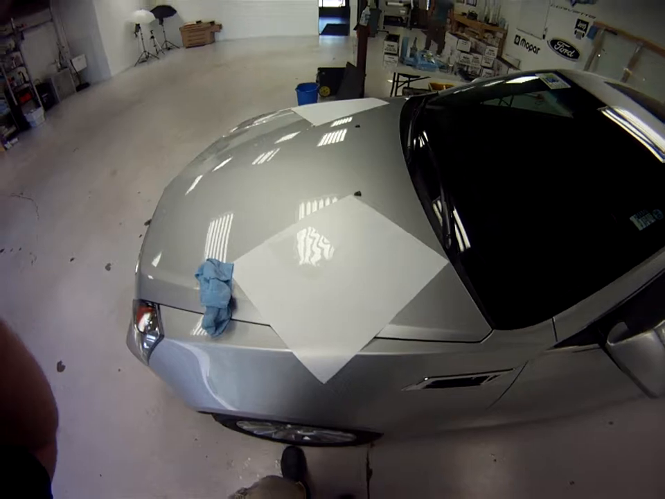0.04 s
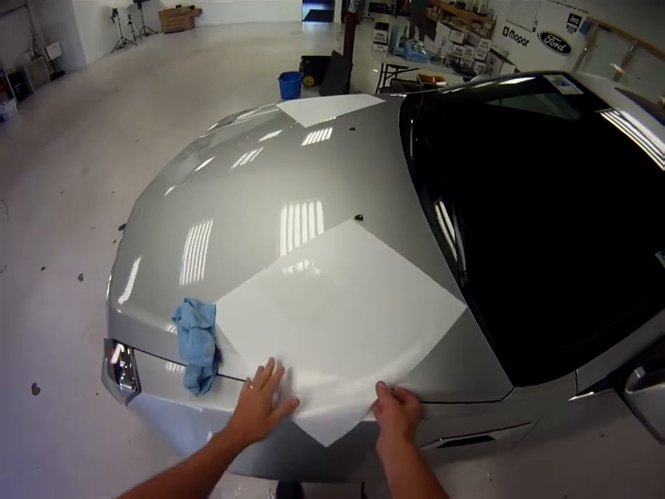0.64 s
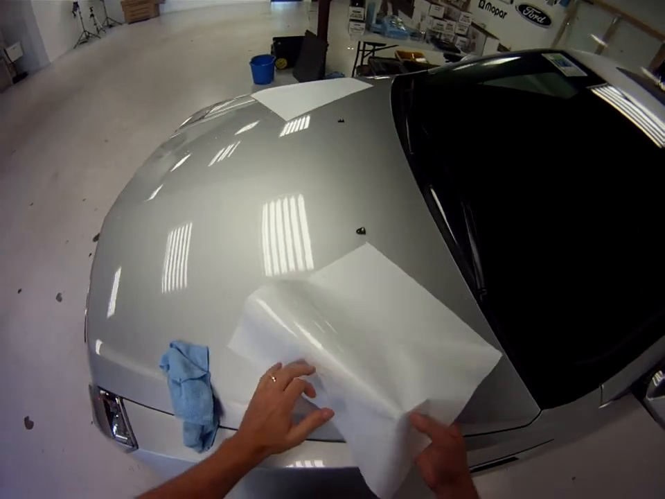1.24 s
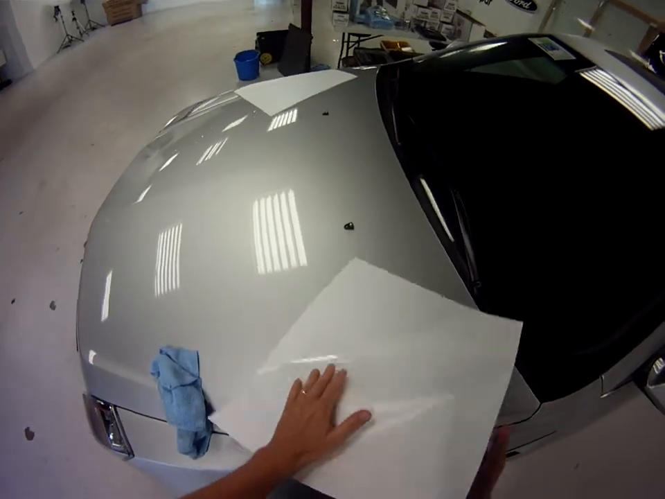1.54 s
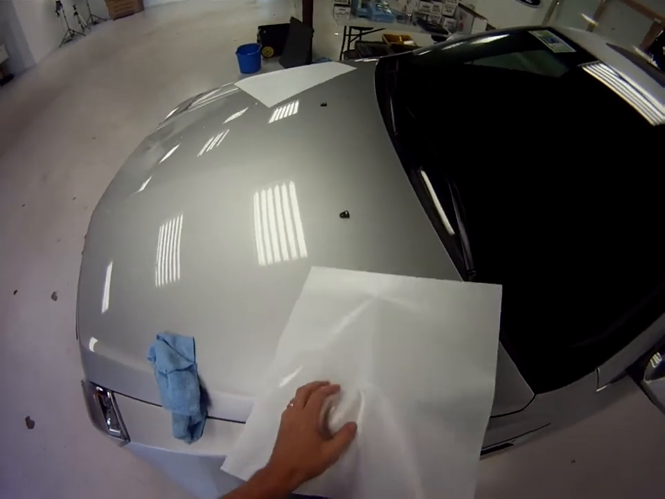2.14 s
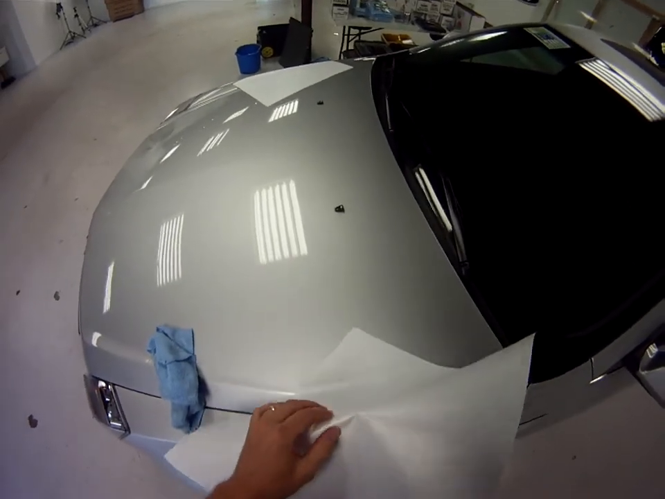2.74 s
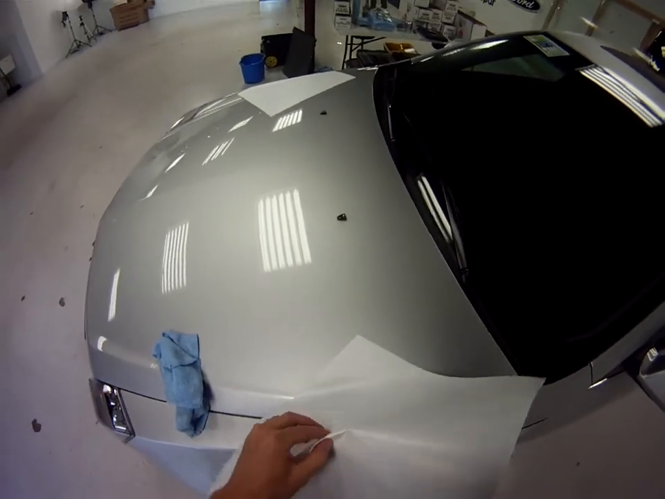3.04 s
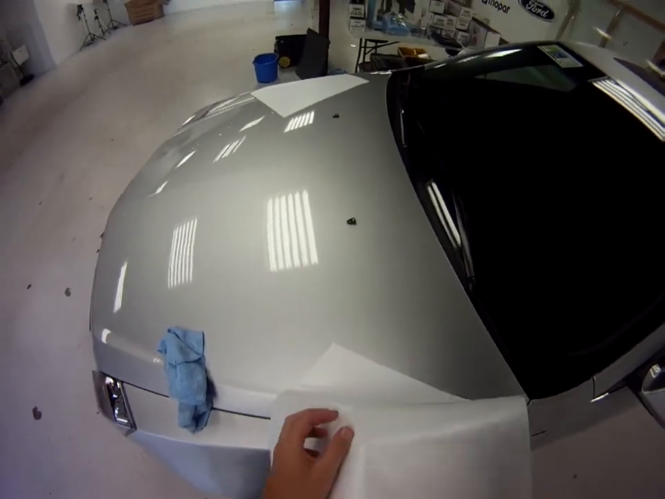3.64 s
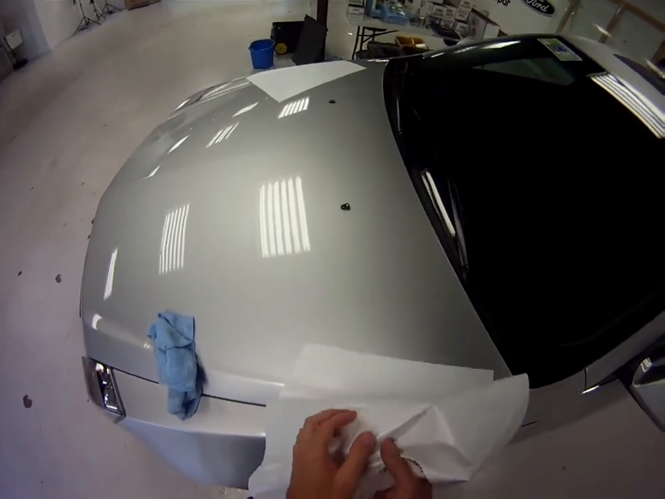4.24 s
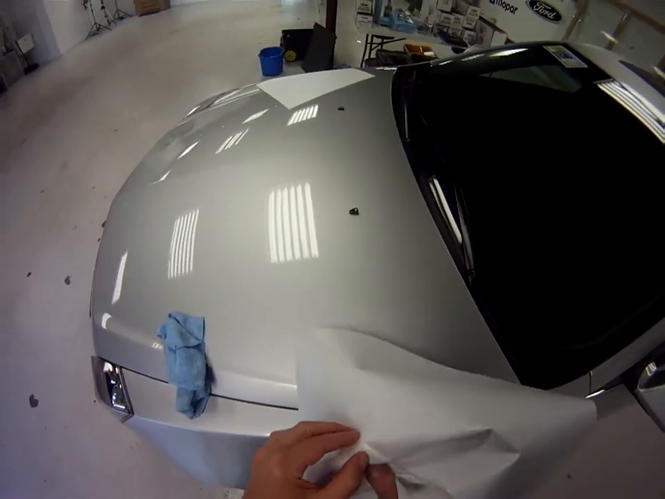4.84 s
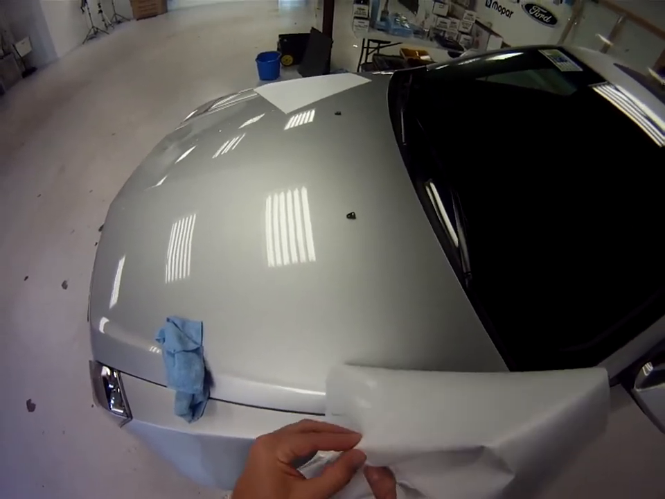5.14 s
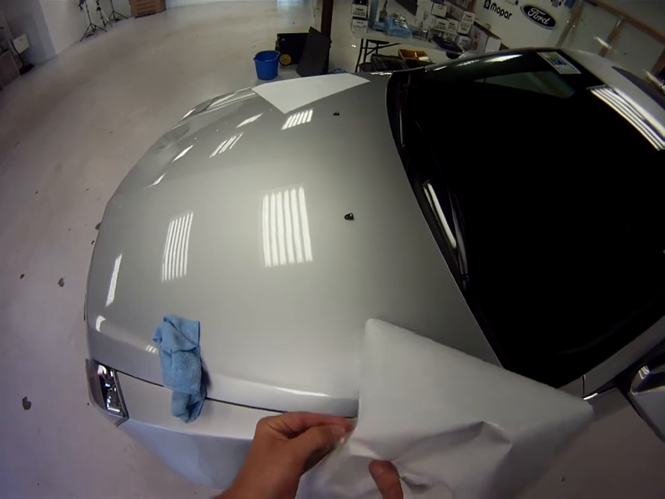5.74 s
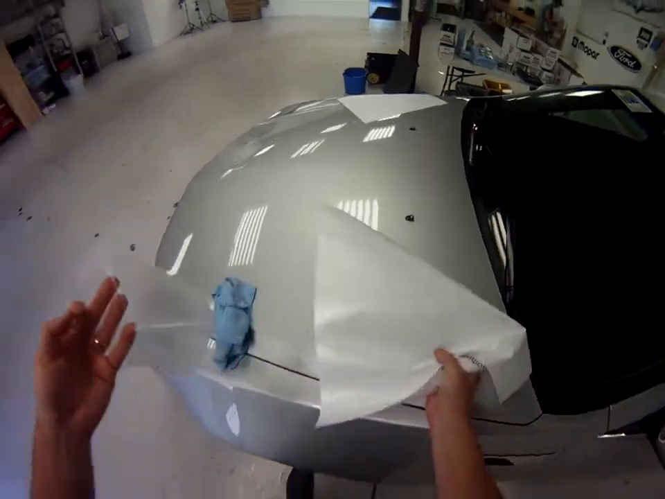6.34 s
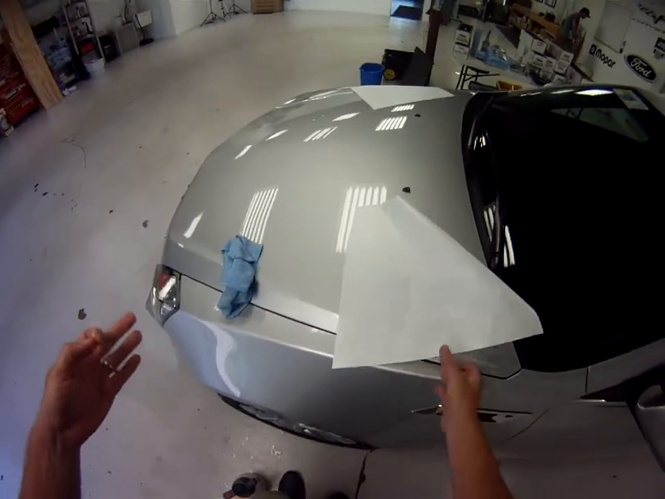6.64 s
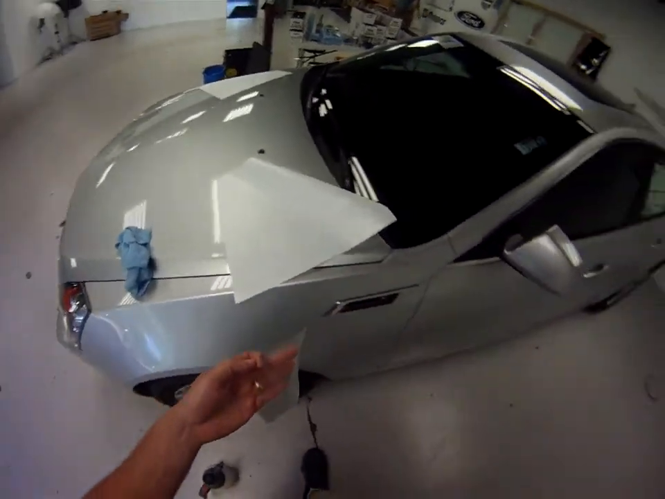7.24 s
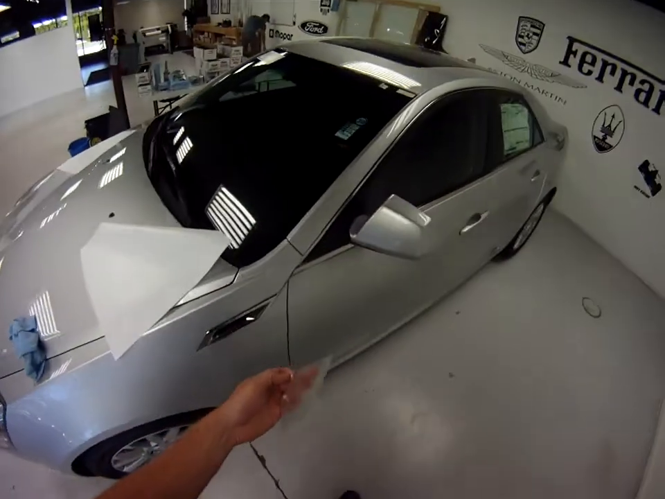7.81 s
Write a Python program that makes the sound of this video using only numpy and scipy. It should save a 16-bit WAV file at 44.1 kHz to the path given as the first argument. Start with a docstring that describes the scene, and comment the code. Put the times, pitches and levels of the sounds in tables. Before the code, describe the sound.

A short, sharp microphone pop opens the sound, and a quiet ventilation rumble and hiss continues throughout. From about 0.7 seconds a large sheet of paper-backed plastic film rustles close by as it is lifted and bent, with sharp snaps around 1.1 seconds and dense, crisp crinkling from 1.5 to 1.9 seconds. It dies down until 3 seconds, when a crease snaps, followed by a short crinkle around 3.5 seconds. Scattered single snaps come near 4.2, 4.6, 4.9 and 5.7 seconds, with a very faint hiss of fingers rubbing paper. A second loud burst of crinkling and snapping runs from 6.2 to 6.7 seconds. Soft, deep footsteps follow from 6.5 seconds to the end, with light rustles near 7.4 and 7.8 seconds. Each snap rings briefly in the workshop hall. The sound is mono and slightly tinny, from a head-worn microphone.

```python
"""Plastic film buckling in a workshop

A large sheet of plastic film on paper backing is lifted, bent and picked at on a car bonnet. Its creases
buckle in single snaps and dense crinkling, and fingers rub the paper. The hall reverberates, its
ventilation hums and soft steps follow. A head-worn mono camera pops as it starts; its housing resonates
near 2 kHz and it holds each sample of a 12 kHz stream."""
import sys
import numpy as np
from scipy import signal
from scipy.fft import rfft, irfft
from scipy.io import wavfile
from scipy.ndimage import uniform_filter1d

SR = 44100
rng = np.random.default_rng(int(sys.argv[2]) if len(sys.argv) > 2 else 0)


def unload_audio(sound):
    """Save the sound as a 16-bit wav file, at the path given as the first command line argument."""
    columns = np.transpose(np.atleast_2d(sound))
    # keep every value between -1 and 1, then stretch to whole-number steps
    steps = np.round(np.clip(columns, -1, 1) * 32767)
    wavfile.write(sys.argv[1], SR, steps.astype(np.int16))


N = 347375
TIME = np.arange(N) / SR
AIR_DB = -58  # level of the ventilation
# Spectrum of the sheet before the housing. Each row: frequency in Hz, relative spectral density in dB.
SHEET = [(150, -20), (400, -7.5), (850, -4.5), (1250, 5), (1700, 7), (2200, 4.5), (2700, 5.5), (3050, 1.5),
         (3500, 6), (4000, 0), (4600, -10), (5300, -6.5), (6000, -7)]


def snaps(creases, body_db=-6.0, flap_db=1.5, ring_db=1.5, flutter_db=-23, flutter_s=0.059, size=2048):
    """Dispersion: bending waves spread a buckling crease's click over a few ms, the low ones longest."""
    out, t = np.zeros(N), np.arange(size) / SR
    colour = through_housing(SHEET)
    noises = rng.standard_normal((len(creases), size))
    for (s, db, low_db, crack_db, hz, swell_ms), noise in zip(creases, noises):
        age = t * 1e3 / swell_ms
        quick, slow = [noise * a * np.exp((1 - a ** 2) / 2) for a in (age, age / 1.83)]
        flutter = noise * from_db(flutter_db) * np.exp(-t / flutter_s)
        body = band(convolve(quick + flutter, colour), 1350, 4600)
        body = body + from_db(ring_db) * facet(body, hz, width_hz=300)
        flap = facet(slow, 1260, width_hz=340) + from_db(-12.5) * band(slow, 426, 1170)
        crack = band(quick, 4950, 5600)
        for part, level_db in [(flap, low_db + flap_db), (body, db + body_db), (crack, crack_db)]:
            peak_rms = np.sqrt(uniform_filter1d(part ** 2, size=176).max())  # loudest 4 ms
            add(out, s - 0.0008, from_db(level_db) * part / peak_rms)
    return out


def facet(x, hz, width_hz):
    """Resonance: a flipped facet rings as one damped mode, with unit gain at its peak."""
    r = np.exp(-np.pi * width_hz / SR)
    feedback = [1, -2 * r * np.cos(2 * np.pi * hz / SR), r * r]
    return signal.lfilter((1 - r * r) / 2 * np.array([1, 0, -1]), feedback, x)


def lesser_creases(effort, per_s=22, spread_db=3, facet_hz=2120, spread_hz=37, swell_ms=1.8):
    """Stress release: creases yield at uneven times, as hard as the sheet is bent; rows for snaps()."""
    rows, s = [], 0
    for wait, strength, pitch in rng.standard_normal((400, 3)):
        s += np.exp(wait / 2) / per_s
        if s >= TIME[-1]:
            break
        db = 20 * np.log10(effort[int(s * SR)]) - 1.5 + spread_db * np.tanh(strength)
        if db > AIR_DB:
            rows.append((s, db, db - 24.5, db - 36, facet_hz + spread_hz * pitch, swell_ms))
    return rows


def crinkle(effort, level_db=-3.0, per_s=1700, spread_db=1.0, clumps_per_s=110, slide_gain=0.93):
    """Shot noise: tiny creases yield more often as the sheet bends harder, over sliding paper's hiss."""
    rate = per_s * (0.13 + np.sqrt(effort / effort.max()))
    buckles = rng.random(N) < rate / SR
    sizes = from_db(spread_db * np.minimum(rng.exponential(1, N), 4)) * rng.choice([-1, 1], N)
    grains = rms_one(buckles * sizes / np.sqrt(rate)) + slide_gain * rng.standard_normal(N)
    clumps = from_db(3 * np.tanh(drift(clumps_per_s)))
    colour = energy_one(through_housing(SHEET))
    return from_db(level_db) * convolve(effort * rms_one(grains * clumps), colour)


def rubbing(grip_db=1.5, grips_per_s=60):
    """Stick-slip friction: skin on paper gives a thin hiss, uneven as it grips and slips."""
    # Finger strokes. Each row: peak time in seconds, level in dB, rise and fall times in seconds.
    strokes = [(1.09, -66, .08, 0.44), (2.25, -72.5, .02, .25), (4.14, -69, 0.1, .06),
               (5.9, -70.5, .3, 0.33), (7.39, -63, .004, .02), (7.81, -65, .01, .06)]
    grip = from_db(grip_db * np.tanh(drift(grips_per_s)))
    return swells(strokes) * grip * rms_one(band(rng.standard_normal(N), 3100, 5700))


def starting_pop(peak_db=-11.0, thump_db=-10, thump_s=0.00358, fizz_db=-28, fizz_s=0.017):
    """Transient response: the camera starts with a fizz, three clicks and a thump; two modes ring on."""
    # The clicks. Each row: start in seconds, peak in dB relative to peak_db.
    clicks = [(0.0192, 6.5), (0.0221, 7.5), (0.026, -6.5)]
    # A low wobble and a ping. Each row: frequency in Hz, level in dB, time to fall 60 dB in seconds.
    modes = [(33.8, -27.5, 0.33), (895, -26.5, 0.12)]
    # A click's spectrum before the housing. Each row: frequency in Hz, relative spectral density in dB.
    click_spectrum = [(100, -44), (350, -20.5), (600, 8), (1000, 7), (1600, 4.5), (2100, -8), (3000, -11),
                      (4500, -15), (6000, -33)]
    out, t = np.zeros(N), np.arange(SR // 2) / SR
    click = through_housing(click_spectrum)
    first_s, last_s = clicks[0][0], clicks[-1][0]
    for s, db in clicks:
        add(out, s, from_db(db + peak_db) * peak_one(click))
    add(out, first_s, -from_db(thump_db) * np.sin(np.pi * np.minimum(t / thump_s, 1)))
    for hz, db, t60 in modes:
        add(out, last_s, from_db(db - 60 * t / t60) * np.sin(2 * np.pi * hz * t))
    fizz = rng.standard_normal(N) * (np.abs(TIME - first_s) < fizz_s / 2)
    return out + from_db(fizz_db) * convolve(fizz, energy_one(click))


def steps(level_db=-8.0, thud_s=0.0056, sway_db=-8.0, sway_s=0.06, lead_s=0.01486, size=22000):
    """Body conduction: footfalls reach the camera as dull thuds, each with a slower, deeper sway."""
    # Soft steps. Each row: time in seconds, thud peak in dB relative to level_db.
    footfalls = [(6.52, -43), (6.929, -44), (7.383, -34.5), (7.74, -48.5), (7.82, -48)]
    out, t = np.zeros(N), np.arange(size) / SR
    for (s, db), noise in zip(footfalls, rng.standard_normal((len(footfalls), size))):
        thud = peak_one(band(noise * t * np.exp(-t / thud_s), 34, 58))
        sway = peak_one(band(noise * t * np.exp(-t / sway_s), 21, 42.5))
        add(out, s - lead_s, from_db(db + level_db) * (thud + from_db(sway_db) * sway))
    return out


def snaps_all_round(creases, level_db=8.5, crack_share_db=12.0):
    """Radiated power: summed over all directions, a snap has the even colour of the whole sheet."""
    out, colour = np.zeros(N), energy_one(through_housing(SHEET))
    for s, body_db, _, crack_db, _, _ in creases:
        strength = np.hypot(from_db(body_db), from_db(crack_db + crack_share_db))
        add(out, s, from_db(level_db) * strength * colour)
    return out


def workshop(x, gap_s=0.00926, early_db=9.5, early_s=0.012):
    """Reverberation: bonnet and floor reflect first, then the hall's tail decays band by band."""
    # Decay of the hall. Each row: frequency in Hz, time to fall 60 dB in seconds.
    decay_times = [(300, 0.71), (1200, 1.0), (2200, 1), (5000, 1)]
    t, edges_hz = np.arange(SR) / SR, np.geomspace(200, 6400, num=6)
    white, tail = rng.standard_normal((2, SR)), np.zeros(SR)
    for k, (low, high) in enumerate(zip(edges_hz, edges_hz[1:])):
        t60 = at_hz(decay_times, np.sqrt(low * high))
        tail += band(white[k % 2], low, high) * from_db(-60 * t / t60)
    response = tail * (t > gap_s) * (1 + from_db(early_db) * np.exp(-t / early_s))
    bandwidth_share = 2 * edges_hz[-1] / SR
    return convolve(x, energy_one(response) * np.sqrt(bandwidth_share))


def ventilation(waver_db=1.0, wavers_per_s=3.536):
    """Broadband noise: the ventilation rumbles and hisses at a slightly wavering level."""
    # Its spectrum before the housing. Each row: frequency in Hz, relative spectral density in dB.
    air_spectrum = [(20, 5.5), (45, 7), (100, 4.5), (200, 1), (400, -4.5), (800, -8.5), (1400, -13),
                    (2100, -21), (3000, -17.5), (4200, -16.5), (5300, -24), (6000, -18)]
    gain = from_db(AIR_DB + waver_db * drift(wavers_per_s))
    return gain * rms_one(convolve(rng.standard_normal(N), through_housing(air_spectrum)))


def through_housing(spectrum, size=4096):
    """Resonant colouring: the minimum-phase impulse response of a spectrum lifted by the housing."""
    # Modes of the camera housing. Each row: frequency in Hz, nominal width in Hz, lift in dB.
    modes = [(2135, 353, 19.5), (3400, 220, 8), (5110, 610, 7.5)]
    hz = np.arange(size // 2 + 1) * SR / size
    power_lift = 1 + sum((from_db(db) ** 2 - 1) / (1 + (2 * (hz - centre) / width) ** 2) ** 1.4
                         for centre, width, db in modes)
    cepstrum = irfft(np.log(from_db(at_hz(spectrum, hz)) * np.sqrt(power_lift)))
    cepstrum[1:size // 2] *= 2  # folding the cepstrum makes the response causal
    cepstrum[size // 2 + 1:] = 0
    return irfft(np.exp(rfft(cepstrum)))


def swells(movements):
    """Incoherent addition: movements build and relax exponentially, and their powers add."""
    power = 0
    for s, db, rise_s, fall_s in movements:
        away = np.maximum((s - TIME) / rise_s, (TIME - s) / fall_s)
        power = power + (from_db(db) * np.exp(-np.minimum(away, 20))) ** 2
    return np.sqrt(power)


def drift(knots_per_s):
    """Random modulation of unit rms, linear between knots."""
    knots = rng.standard_normal(4000)
    return rms_one(np.interp(TIME * knots_per_s, np.arange(len(knots)), knots))


def from_db(db):
    """Decibels to amplitude ratio."""
    return 10 ** (np.asarray(db) / 20)


def rms_one(x):
    """Normalise to unit rms."""
    return x / np.sqrt(np.mean(x ** 2) + 1e-20)


def energy_one(x):
    """Normalise to unit energy."""
    return x / np.sqrt(np.sum(x ** 2))


def peak_one(x):
    """Normalise to unit peak."""
    return x / np.abs(x).max()


def at_hz(points, hz):
    """Interpolate a table on a log-frequency axis."""
    knots_hz, values = np.transpose(points)
    return np.interp(np.log(np.maximum(hz, 1)), np.log(knots_hz), values)


def band(x, low_hz, high_hz):
    """Causal band-pass filter."""
    return signal.sosfilt(signal.butter(2, [low_hz, high_hz], "band", fs=SR, output="sos"), x + 1e-18)


def convolve(x, response):
    """Linear filtering by an impulse response."""
    return signal.fftconvolve(x, response)[:len(x)]


def add(out, s, sound):
    """Superpose a sound from s seconds on."""
    start = max(round(s * SR), 0)
    out[start:start + len(sound)] += sound[:N - start]


def scene(crinkle_room_db=-7):
    """Superposition: the sheet's direct sound, the hall and the background meet at one microphone."""
    # The loudest creases buckling. Each row: time in seconds, relative levels of body, low flap and
    # high crack in dB, facet pitch in Hz, swell time in milliseconds.
    loud_creases = [(0.7, -38.5, -62, -51.5, 2160, 2.1), (0.7233, -35, -65, -44.5, 2030, 2.7),
                    (0.9662, -35, -61.5, -55, 2130, 1.9), (0.9857, -35, -55, -56, 2120, 1.4),
                    (1.0211, -38, -54.5, -55, 2090, 1.9), (1.0974, -20.5, -51, -41, 2100, 2.1),
                    (1.1124, -28.5, -48, -56, 1990, 1.8), (1.1353, -20, -52, -38, 2380, 2.3),
                    (1.1634, -33, -56, -51, 2340, 2.1), (1.258, -35.5, -54.5, -60, 2000, 2),
                    (1.493, -30.5, -65, -68, 1940, 2.1), (1.5804, -20, -48, -47, 2140, 1.6),
                    (1.6144, -23.5, -57, -48, 2100, 2.4), (1.7012, -25.5, -47, -45, 2060, 2.1),
                    (1.718, -22, -57, -54, 2030, 1.3), (1.7325, -21, -61, -55, 2030, 2),
                    (1.7524, -25.5, -56, -50, 2070, 2.1), (1.8327, -32, -51, -66, 2040, 2.2),
                    (3.0372, -25, -48, -43, 2330, 2.6), (3.1764, -35, -55, -55.5, 2180, 1.9),
                    (3.5056, -24.5, -46, -49, 2290, 2.06), (3.5964, -32, -59, -49, 2120, 2.9),
                    (3.8769, -37, -54, -71, 2190, 2.1), (3.9185, -28.5, -57, -69.5, 2210, 2.9),
                    (4.0711, -35.5, -57, -58, 2060, 2.6), (4.188, -29, -60, -50.5, 2060, 1.6),
                    (4.6369, -21, -47, -44, 2000, 2.95), (4.9081, -31.5, -41.5, -45, 1910, 2.1),
                    (5.6188, -39, -71, -77, 2000, 1.1), (5.6416, -37.5, -66, -66, 2060, 1.9),
                    (5.7185, -30, -45.5, -39.5, 2290, 1.66), (5.8369, -32.5, -52.5, -50, 2260, 2.5),
                    (5.918, -36, -50, -50, 2110, 2), (5.9937, -43.5, -55, -75.5, 1970, 1.6),
                    (6.1758, -29, -52.5, -45, 2750, 2.6), (6.1836, -26, -53, -55, 2070, 2.5),
                    (6.1944, -26.5, -48.5, -59, 2310, 2.6), (6.3669, -34, -54, -51.5, 2290, 2.8),
                    (6.4677, -23, -53, -40.5, 2400, 2.2), (6.5425, -27.5, -62, -58, 2040, 1.87)]
    # Bends of the sheet. Each row: peak time in seconds, effort in dB, rise and fall times in seconds.
    bends = [(0.635, -55.5, .012, .03), (0.754, -38, 0.037, 0.061), (1.0, -44.5, 0.057, 0.13),
             (1.148, -33.5, 0.023, 0.035), (1.26, -41, .01, .035), (1.499, -36.5, 0.0061, 0.17),
             (1.613, -30.5, 0.026, 0.044), (1.729, -30.5, 0.042, 0.063), (1.93, -45.5, 0.025, 0.048),
             (2.094, -45.5, 0.0092, .022), (2.445, -51, 0.018, 0.021), (2.7, -57, 0.11, 0.11),
             (3.185, -48, 0.0043, 0.012), (3.42, -57, 0.04, 0.091), (3.52, -43, 0.011, 0.092),
             (3.598, -36.5, .016, 0.048), (3.9, -49, 0.12, 0.14), (5.5, -60, 0.11, 0.17),
             (6.19, -35, 0.011, 0.024), (6.255, -43, .02, .035), (6.325, -42, .012, 0.022),
             (6.474, -28.5, 0.014, .025), (6.545, -33, 0.03, 0.031), (6.644, -41.5, 0.013, 0.035),
             (7.394, -52.5, .006, 0.1), (7.803, -50.5, 0.011, 0.031)]
    effort = swells(bends)
    rustle = crinkle(effort)
    creases = list(loud_creases) + lesser_creases(effort)
    room = workshop(snaps_all_round(creases) + from_db(crinkle_room_db) * rustle)
    mono = rustle + room + ventilation() + steps() + starting_pop() + rubbing() + snaps(creases)
    return np.array([mono, mono])


def record(dry, hold_hz=12000, cutoff_hz=15350):
    """Zero-order hold: each sample is held four times, so spectral images glitter around 12 kHz."""
    anti_alias = signal.firwin(161, 5880, fs=SR)
    band_limited = signal.fftconvolve(dry, [anti_alias], "same", axes=1)
    stream = signal.resample_poly(band_limited, hold_hz, SR, axis=1, window=("kaiser", 2))
    held = signal.resample_poly(np.repeat(stream, 4, axis=1), SR, 4 * hold_hz, axis=1)[:, :N]
    return signal.fftconvolve(held, [signal.firwin(121, cutoff_hz, fs=SR)], "same", axes=1)


dry = scene()
out = record(dry)
unload_audio(out)
```